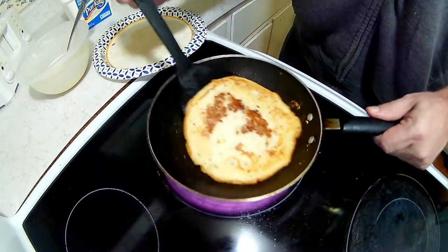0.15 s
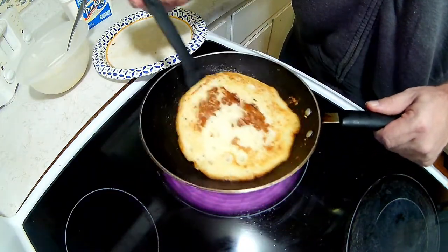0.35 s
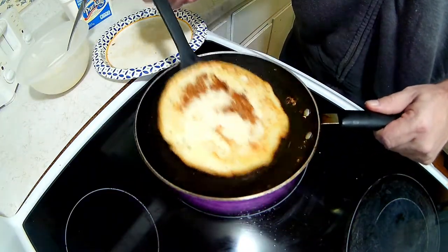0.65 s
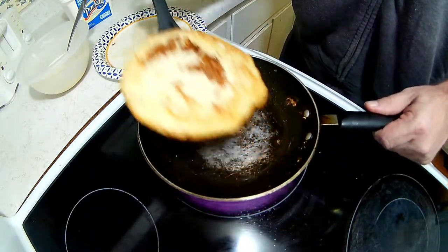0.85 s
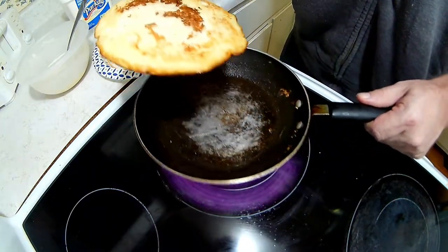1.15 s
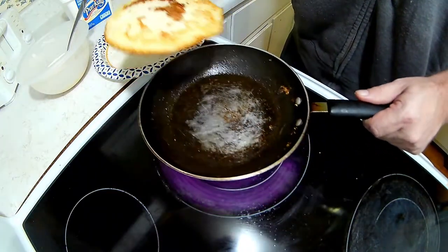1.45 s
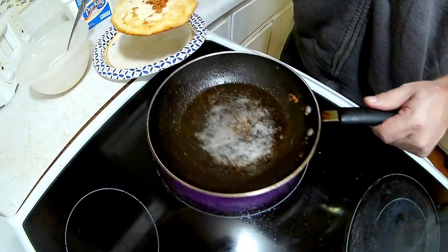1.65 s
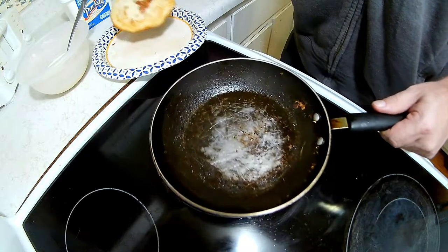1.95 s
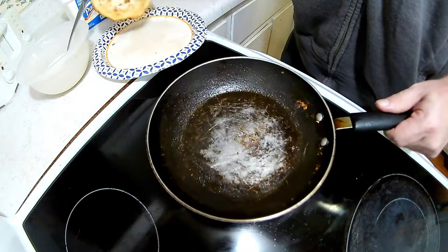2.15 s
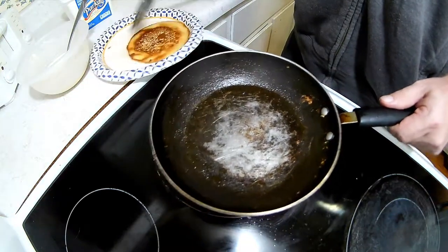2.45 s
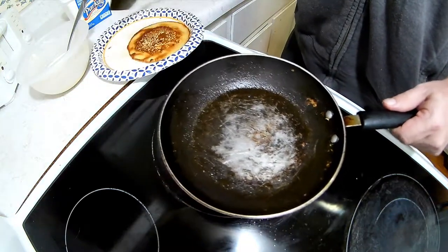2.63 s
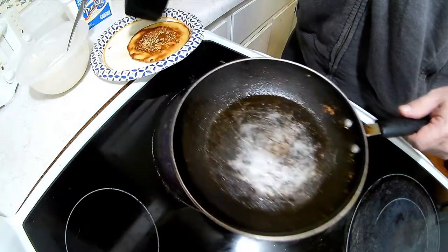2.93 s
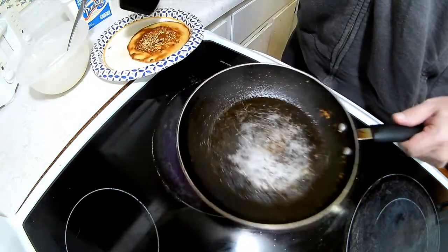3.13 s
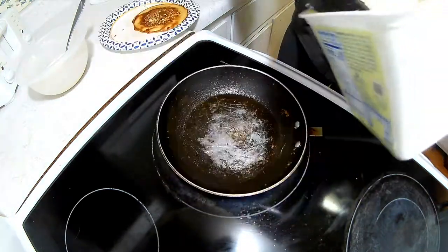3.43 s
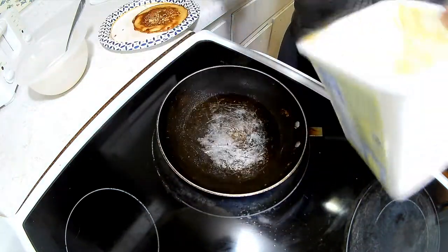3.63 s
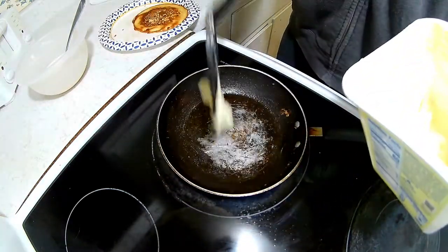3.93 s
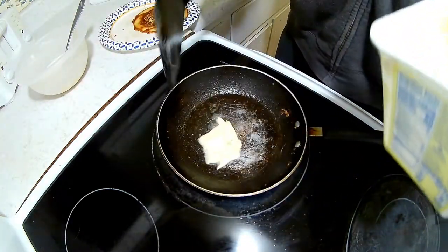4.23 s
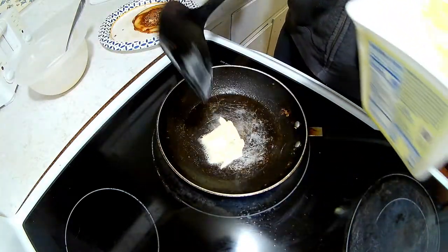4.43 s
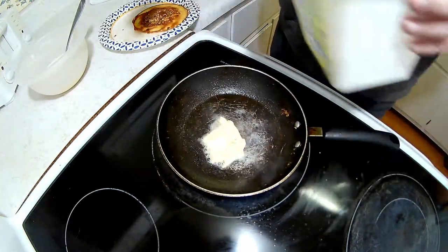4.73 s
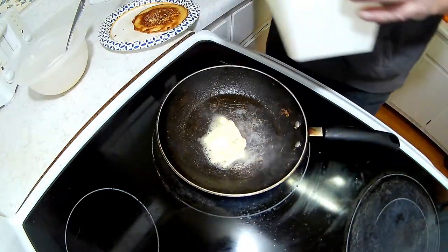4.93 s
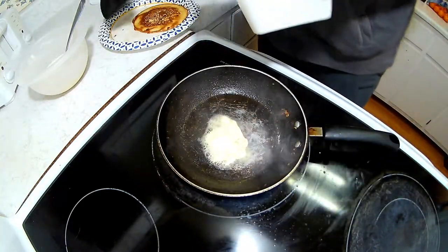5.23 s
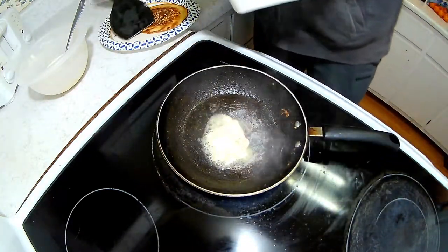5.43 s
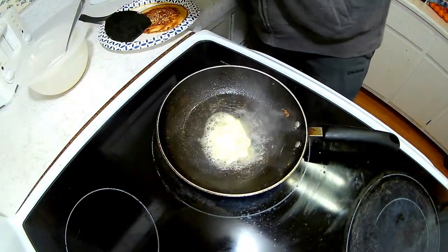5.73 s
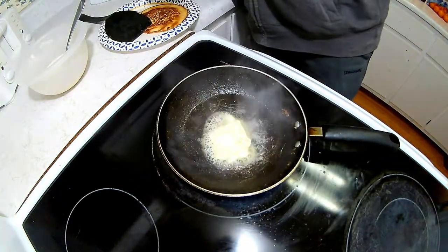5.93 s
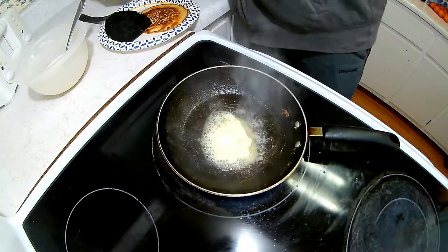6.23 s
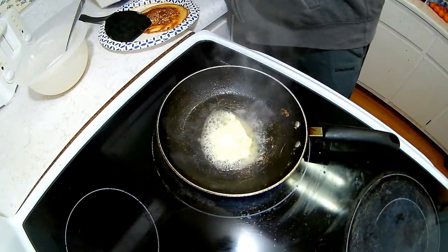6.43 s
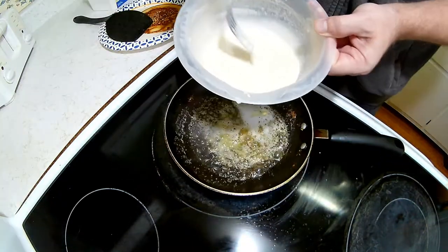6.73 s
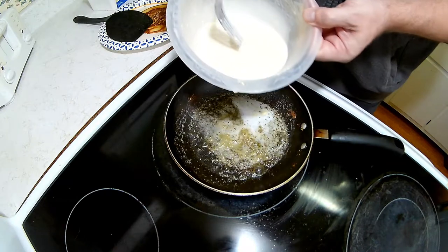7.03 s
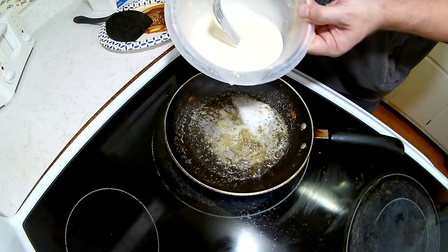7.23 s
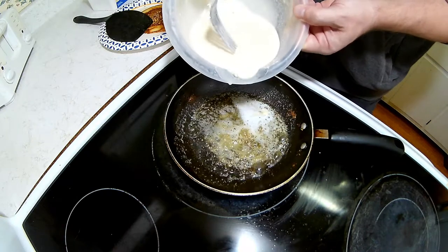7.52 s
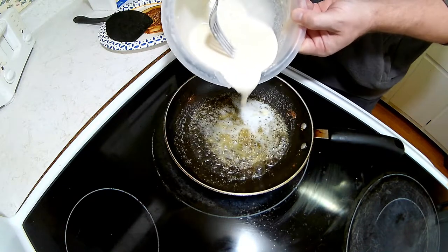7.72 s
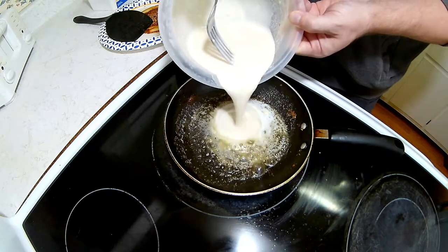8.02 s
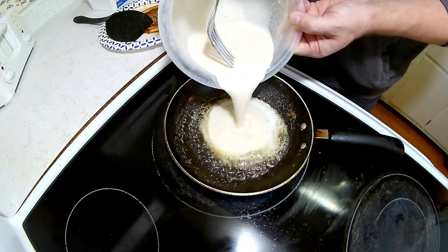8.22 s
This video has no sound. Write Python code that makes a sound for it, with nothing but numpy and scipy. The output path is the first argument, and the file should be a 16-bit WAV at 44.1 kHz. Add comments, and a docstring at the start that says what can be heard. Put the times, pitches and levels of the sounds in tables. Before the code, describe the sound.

A plastic spatula scrapes a pan, a pancake drops on a plate, the pan rattles down, butter sizzles, then batter gurgles into quieter fat.

```python
"""A plastic spatula scrapes under a pancake in a pan, over a low room rumble, and drops it on a plate.
The pan rattles back onto the glass hob, butter lands and sizzles, the spatula clacks on the plate.
After a jump to a later moment batter gurgles into quieter fat; a bowl bumps around the jump.
Contacts are click rattles ringing through bodies; fat and rumble are shaped noise, with bubble pops
in the fat; spits and whistle flares are noise puffs."""
import sys
import numpy as np
from scipy import signal
from scipy.io import wavfile
from scipy.ndimage import uniform_filter1d

SR = 44100
rng = np.random.default_rng(int(sys.argv[2]) if len(sys.argv) > 2 else 0)


def wav_out(sig):
    """Save sig, one row per channel (or a flat mono array), as 16-bit PCM at SR to the path in sys.argv[1]."""
    wavfile.write(sys.argv[1], SR, np.round(np.clip(np.atleast_2d(sig).T, -1, 1) * 32767).astype(np.int16))


N = 369116
TIME_S = np.arange(N) / SR
JUMP_S = 6.505  # cut to the later moment

# Plate modes under soft and hard blows: centre_hz, width_hz, relative_db
PLATE_RESONANCES = [(600, 110, 0), (996, 210, 2.5), (1027, 30, 6.5), (1140, 45, 3.5), (1334, 21, -3),
                    (1942, 35, 0), (2270, 200, -13), (2920, 60, -18), (3320, 52, -13.5), (4200, 170, -16.5),
                    (4940, 170, -17.5), (5740, 68, -16), (6100, 150, -20), (6920, 170, -21.5)]


def gain_of(db):
    """Decibels to amplitude."""
    return 10 ** (np.asarray(db) / 20)


def evened(x):
    """Scales to rms 1."""
    return x / np.sqrt(np.mean(x ** 2) + 1e-20)


def level(rows):
    """Interpolates (s, dB) breakpoints to every sample."""
    at_s, db = np.transpose(rows)
    return np.interp(TIME_S, at_s, db)


def bin_hz(size):
    """Bin frequencies of a real FFT."""
    return np.fft.rfftfreq(size, 1 / SR)


def shape(hz, broad, modes, broad_db):
    """Amplitude over frequency: a broad colour, offset by broad_db, plus resonance peaks in power."""
    f, db = np.transpose(broad)
    power = gain_of(2 * (np.interp(np.log(hz + 1), np.log(f + 1), db) + broad_db))
    for centre_hz, width_hz, top_db in modes:
        detune = 2 * (hz - centre_hz) / width_hz
        power = power + gain_of(2 * top_db) / (1 + detune ** 2) ** 2
    return np.sqrt(power)


def body(gain):
    """Minimum-phase ring of an amplitude response, 4000 samples, energy 1."""
    two_sided = np.r_[gain, gain[-2:0:-1]]
    log_gain = np.log(np.maximum(two_sided, 1e-5))
    spectrum = np.exp(np.conj(signal.hilbert(log_gain)))
    ring = np.fft.ifft(spectrum).real[:4000]
    return ring / np.linalg.norm(ring)


def hiss(gain, size, patchy_db, swell_db, patch_bins):
    """Random short-time spectra with drifting patches and a flicker shared by all bins."""
    frames = 4 * N // size + 8
    real, imag, patches = rng.standard_normal((frames, len(gain), 3)).T
    patches = uniform_filter1d(patches, patch_bins, 0)
    patches = evened(uniform_filter1d(patches, 14, 1))
    swell = evened(uniform_filter1d(rng.standard_normal(frames), 16))
    drift = gain_of(patchy_db * patches + swell_db * swell)
    z = (real + 1j * imag) * gain[:, None] * drift
    return evened(signal.istft(z, nperseg=size, noverlap=3 * size // 4)[1][:N])


def puffs(rows, t60_s):
    """Short decaying noise puffs around a pitch; rows: start_s, level_db, pitch_hz, width_hz."""
    out, age_s = np.zeros(N + 4000), np.arange(4000) / SR
    noise = rng.standard_normal((len(rows), 2, 4000))
    for (start_s, db, hz, width_hz), (real, imag) in zip(rows, noise):
        pole = np.exp(-np.pi * width_hz / SR)
        slow = signal.lfilter([1], [1, -pole], real + 1j * imag)
        band = evened((slow * np.exp(2j * np.pi * hz * age_s)).real)
        attack = np.minimum(age_s / 0.0036, 1)
        out[round(start_s * SR):][:4000] += gain_of(db - 60 * age_s / t60_s) * band * attack
    return out[:N]


def frying(broad, modes, broad_db, pops_per_s, spread_db, pops_db):
    """Dense steam hiss plus bursting bubbles of uneven size, both in the same colour."""
    steam_gain = shape(bin_hz(512), broad, modes, broad_db)
    steam = hiss(steam_gain, size=512, patchy_db=2.0, swell_db=1.06, patch_bins=3)
    sizes = gain_of(spread_db * np.minimum(rng.exponential(1, N), 5))
    bursts = sizes * (rng.random(N) < pops_per_s / SR) * rng.choice([-1., 1.], N)
    pops = signal.oaconvolve(bursts, body(shape(bin_hz(16384), broad, modes, broad_db)))
    return evened(steam + gain_of(pops_db) * evened(pops[:N]))


def rumble():
    """Low room noise gathered in a few room modes, a little quieter after the jump."""
    # hz, relative_db_per_hz
    rumble_colour = [(12, -21), (22, -10), (49, -11.5), (103, -2), (141, -10), (220, -18), (343, -19.5),
                     (480, -29), (600, -23), (1070, -25), (2000, -41), (3100, -47.5), (7900, -54.5),
                     (15700, -55.5)]
    # centre_hz, width_hz, relative_db
    room_modes = [(104.2, 14.2, 0), (222.8, 49, -11.5), (349, 16, -15.5), (567, 14, -12.5)]
    gain = shape(bin_hz(2048), rumble_colour, room_modes, 0.23)
    rms_db = np.where(TIME_S < JUMP_S, -43.5, -45.5)
    return gain_of(rms_db) * hiss(gain, size=2048, patchy_db=1.2, swell_db=-0.24, patch_bins=12)


def simmer():
    """Spent fat ticks on after the jump; spreading batter lowers it and smothers its treble."""
    # Quiet fat: hz, relative_db_per_hz
    simmer_colour = [(260, -27), (450, -37), (700, -28), (850, 5), (1050, -9.5), (1710, -7.5),
                     (3000, -13.5), (4500, -16), (6800, -17.5), (7900, -35), (8780, -24.5), (13900, -34.5)]
    bare_db, covered_db = -56, -60
    bare_tilt_db, covered_tilt_db = 1, -0.5  # treble rise per octave
    cover_start_s, cover_takes_s = 7.92, 0.32
    fat = frying(simmer_colour, [], -.1, pops_per_s=330, spread_db=4.0, pops_db=-8)
    hz, frame_s, z = signal.stft(fat, SR, nperseg=512)
    cover = np.clip((frame_s - cover_start_s) / cover_takes_s, 0, 1)
    fat_db = bare_db + cover * (covered_db - bare_db)
    tilt_db = bare_tilt_db + cover * (covered_tilt_db - bare_tilt_db)
    octaves = np.log2(hz / 3000 + .05)  # the offset limits the bass end
    z = z * gain_of(fat_db + np.outer(octaves, tilt_db))
    return (TIME_S >= JUMP_S) * signal.istft(z, SR, nperseg=512)[1][:N]


def gurgle():
    """Batter meets the fat: wet bubbles and hiss in one wide low band."""
    # centre_hz, width_hz
    gurgle_band = (1640, 1600)
    # at_s, level_db
    gurgle_level = [(7.45, -66), (7.56, -56), (7.7, -72), (7.9, -57), (8.05, -55.5), (8.37, -56.5)]
    floor = [(0, -60), (22050, -60)]
    wet = frying(floor, [(*gurgle_band, 0)], 0, pops_per_s=230, spread_db=3, pops_db=-8)
    return gain_of(level(gurgle_level)) * wet


def spits():
    """Single spits of fat, each one wide, quick puff."""
    # start_s, level_db, pitch_hz
    fat_spits = [(4.045, -27.5, 1220), (4.221, -36, 2850), (6.132, -44, 4230), (6.79, -49, 12100),
                 (6.99, -56, 9400), (7.163, -56, 9400), (7.219, -52, 4440), (7.553, -42, 3800),
                 (7.925, -50, 9600), (7.949, -49, 9900)]
    rows = [(s, db, hz, 0.17 * hz) for s, db, hz in fat_spits]
    return puffs(rows, t60_s=0.016)


def whistle():
    """Air over the pan whistles in a narrow noise band; short flares share its pitch."""
    # centre_hz, width_hz
    whistle_band = (1742, 88)
    # at_s, level_db
    whistle_level = [(4.03, -57), (4.25, -46), (4.6, -50), (5.2, -54), (6.1, -55.5), (6.505, -55.5)]
    # start_s, level_db
    whistle_flares = [(4.035, -38.5), (4.221, -38.5), (4.28, -34.5), (4.432, -36.5), (4.573, -36)]
    hz, width_hz = whistle_band
    peak = 1 / (1 + (2 * (bin_hz(2048) - hz) / width_hz) ** 2)
    air = hiss(peak, size=2048, patchy_db=-2.5, swell_db=0.0, patch_bins=4)
    flares = puffs([(s, db, hz, 100) for s, db in whistle_flares], t60_s=0.071)
    return gain_of(level(whistle_level)) * air, flares


def sizzle():
    """Butter boils, with the whistle over it, from its landing until the jump."""
    # Butter on the hot pan: hz, relative_db_per_hz
    sizzle_colour = [(260, -29), (450, -10.5), (700, -14), (870, -3.5), (1410, -9), (1760, -5.5),
                     (2960, -16), (4400, -18), (7000, -19.5), (7900, -41), (8700, -21.5), (10300, -31),
                     (11900, -24), (13400, -32), (14400, -31), (15700, -44)]
    # Air resonances over the pan: centre_hz, width_hz, relative_db
    air_modes = [(888, 8.1, 5), (2520, 33, -6.5), (3256, 22, -12), (3594, 28.5, -4.5), (4830, 60, -24.5),
                 (6760, 150, -18)]
    # at_s, level_db
    sizzle_level = [(4.03, -45.5), (4.7, -47), (5.7, -44.5), (6.5, -45)]
    landing_s, fade_in_s = sizzle_level[0][0], 0.035
    on = np.clip((TIME_S - landing_s) / fade_in_s, 0, 1) * (TIME_S < JUMP_S)
    boil = frying(sizzle_colour, air_modes, -5.0, pops_per_s=830, spread_db=-1.0, pops_db=-7.5)
    air, flares = whistle()
    return on * (gain_of(level(sizzle_level)) * boil + air) + flares


def contacts(rows, thing, broad_db, clicks_per_s, blow, rise_s, t60_s):
    """A blow inside a rattle of tiny clicks that swells, holds and dies, ringing uneven modes."""
    broad, modes = thing
    out, age_s = np.zeros(N + SR), np.arange(SR // 4) / SR
    noise = rng.standard_normal((len(rows), len(age_s)))
    chance = rng.random((len(rows), len(age_s)))
    spots = rng.uniform(-1, 1, (len(rows), len(modes)))  # where each contact touches
    high_pass = signal.firwin(65, 2000, pass_zero=False, fs=SR)
    main_blow = blow * (np.arange(len(age_s)) == round(rise_s * SR))
    for (start_s, db, hold_s, treble_db), size, draw, spot in zip(rows, noise, chance, spots):
        rattle = size * (draw < clicks_per_s / SR) * np.sqrt(SR / clicks_per_s)
        decay_db = 60 * np.maximum(age_s - rise_s - hold_s, 0) / t60_s
        swell = gain_of(db - decay_db) * np.minimum(age_s / rise_s, 1)
        force = (rattle + main_blow) * swell
        force = force * np.linalg.norm(swell) / np.linalg.norm(force + 1e-12)
        # the spot shifts mode pitch by up to 1.5 % and mode level by up to 3.5 dB
        pitch_shift = 1 + np.outer(spot[::-1], [.015, 0, 0])
        touched = modes * pitch_shift + np.outer(spot, [0, 0, 3.5])
        ring = body(shape(bin_hz(8192), broad, touched, broad_db))
        bright = signal.oaconvolve(ring, high_pass, "same")
        sound = signal.oaconvolve(force, ring + (gain_of(treble_db) - 1) * bright)
        if start_s < JUMP_S:
            sound = sound[:round((JUMP_S - start_s) * SR)]
        out[max(round(start_s * SR), 0):][:len(sound)] += sound
    return out[:N]


def bowl_bumps():
    """Bowl bumps: short rattles with a strong blow through the bowl's modes."""
    # start_s, level_db, hold_s, treble_above_2khz_db
    bumps = [(6.424, -33.5, 0.0041, -5), (6.437, -30, 0.0019, -10), (6.47, -38, 0.024, -4),
             (6.567, -25, 0.00056, 10), (6.58, -28.5, 0, -5), (6.592, -31.5, 0.00093, -2),
             (6.604, -40, 0.0017, -3)]
    # Broad colour: hz, relative_db_per_hz; modes: centre_hz, width_hz, relative_db
    bowl = [(90, -38), (150, -3.5), (440, -9.5), (820, -10), (1260, -14), (2000, -19), (2800, -34),
            (3600, -48), (6500, -65), (11000, -100)], [(344, 38, -6), (640, 190, -3), (840, 160, -2.5),
            (1080, 140, -4.5), (1750, 310, -21)]
    return contacts(bumps, bowl, broad_db=-4.0, clicks_per_s=4000, blow=8., rise_s=0.00143, t60_s=0.029)


def butter_plops():
    """Butter lands: dense soft clicks through one low mode."""
    # start_s, level_db, hold_s, treble_above_2khz_db
    plops = [(4.07, -38.5, 0.0089, -5), (4.094, -33, 0.0011, -4), (4.107, -43, 0.01, 6)]
    # Broad colour: hz, relative_db_per_hz; modes: centre_hz, width_hz, relative_db
    butter = [(71, -33), (120, -27), (330, 4), (596, -19), (673, -7.5), (1700, -21), (3000, -14),
              (3900, -41), (6600, -120)], [(241, 34, -0.86)]
    return contacts(plops, butter, broad_db=-7.0, clicks_per_s=9800, blow=4., rise_s=0.00294, t60_s=0.078)


def hob_rattle():
    """The pan set on the glass hob: sparse clicks, each with a clear blow."""
    # start_s, level_db, hold_s, treble_above_2khz_db
    rattles = [(3.304, -52, 0.039, 11.5), (3.349, -34.5, .002, -5), (3.372, -36.5, 0.0078, 7),
               (3.386, -30, 0.012, 0), (3.402, -33, 0.0031, 5.5), (3.418, -38.5, 0.011, -4),
               (3.447, -44, .01, -8), (3.488, -43.5, .002, -7)]
    # Broad colour: hz, relative_db_per_hz; modes: centre_hz, width_hz, relative_db
    hob = [(88, -46), (150, -12), (221, -0.5), (248, -9), (490, -13), (948, -9), (1940, -16), (2600, -32.5),
           (15500, -66)], [(650, 70, 2.5), (902, 180, -3), (1270, 78, -10), (1605, 99, -11),
           (1920, 140, -18), (2320, 120, -24)]
    return contacts(rattles, hob, broad_db=-7.0, clicks_per_s=2700, blow=5.3, rise_s=0.00552, t60_s=0.074)


def plate_drops():
    """The pancake drops on the plate and damps it, widening its modes."""
    # start_s, level_db, hold_s, treble_above_2khz_db
    drops = [(2.357, -47, 0.031, 2.5), (2.372, -35.5, 0.0013, 1), (2.382, -30.5, 0.0017, 0),
             (2.398, -41, 0.046, 1.5), (2.439, -30, 0.02, 1), (2.45, -26, 0, -5), (2.458, -25, 0.0049, 2.5),
             (2.478, -33, 0.0058, -3)]
    # hz, relative_db_per_hz
    soft_colour = [(20, -2), (45, -2), (110, 6), (200, -3.5), (420, -1), (535, -1.5), (900, -6.5),
                   (1200, -7.5), (3400, -18.5), (5200, -48), (6300, -28.5), (7600, -55), (8600, -42),
                   (15500, -62)]
    plate = soft_colour, np.multiply(PLATE_RESONANCES, [1, 2.5, 1])
    return contacts(drops, plate, broad_db=7.0, clicks_per_s=7000, blow=2.2, rise_s=.004, t60_s=0.06)


def plate_clacks():
    """The spatula clacks on the plate: fast hard blows on the undamped modes."""
    # start_s, level_db, hold_s, treble_above_2khz_db
    clacks = [(5.434, -42.5, 0.022, -6), (5.6245, -15, 0.0012, 7.5), (5.629, -9, 0.0025, 2.5),
              (5.643, -22.5, 0.0098, 5), (5.674, -34, 0.0091, -15), (5.703, -37.5, 0.021, -8)]
    # hz, relative_db_per_hz
    hard_colour = [(24, -32), (50, -6), (90, 14), (150, -1.5), (240, 2), (400, -15), (606, -4.5), (1020, 1),
                   (1410, -6), (1910, -6), (3840, -27.5), (6160, -26), (7700, -51), (15500, -60)]
    plate = hard_colour, PLATE_RESONANCES
    return contacts(clacks, plate, broad_db=-4.0, clicks_per_s=7000, blow=5.8, rise_s=.0012, t60_s=0.033)


def scrape():
    """The spatula slips along the pan: dense click rattles through the pan's modes."""
    # start_s, level_db, hold_s, treble_above_2khz_db
    slips = [(0.0, -38, 0.00013, 6), (0.014, -38.5, 0.066, -2.5), (0.061, -34, 0.027, 2),
             (0.12, -48.5, 0.047, 6), (0.163, -31.5, 0, -8), (0.182, -31.5, 0, -5), (0.197, -42, 0.023, -1),
             (0.226, -35, 0.021, -0.5), (0.244, -35, 0.019, 3), (0.295, -55, 0.0025, 2),
             (0.338, -46, .05, 3), (0.403, -39.5, .045, 4.5), (0.515, -49.5, 0.033, 4),
             (0.6, -54.5, 0.029, 4)]
    # Broad colour: hz, relative_db_per_hz; modes: centre_hz, width_hz, relative_db
    pan = [(290, -49), (500, -14), (1040, -10), (1510, -17), (1750, -5), (2430, -22), (2740, -37),
           (2890, -28.5), (12000, -66), (15600, -88), (22000, -120)], [(1030, 150, 1), (1190, 370, -9),
           (1360, 170, -14), (1820, 130, -9), (2250, 160, -24), (2717, 59, -15), (3350, 57, -27),
           (3990, 100, -26), (4600, 130, -39), (5590, 89, -31), (6330, 150, -37), (7250, 120, -39)]
    return contacts(slips, pan, broad_db=-4.5, clicks_per_s=9000, blow=2.7, rise_s=.005, t60_s=0.11)


def kitchen(x):
    """Sparse taps of random sign, dying quickly: a small hard room that returns little bass."""
    at = np.arange(300, 15000, 20) + rng.integers(0, 20, 735)
    t60_s = 0.22
    taps = np.zeros(15100)
    taps[at] = rng.choice([-1., 1.], 735) * gain_of(-60 * at / SR / t60_s)
    taps = signal.lfilter(*signal.butter(2, 350, "high", fs=SR), taps)
    return signal.oaconvolve(x, taps / np.linalg.norm(taps))[:N]


def scene():
    """All sources in one channel; the jump cuts off ringing contacts and their room tail."""
    handling = scrape() + plate_drops() + hob_rattle() + butter_plops() + plate_clacks() + bowl_bumps()
    late = TIME_S >= JUMP_S
    room = np.where(late, kitchen(handling * late), kitchen(handling))
    fat = sizzle() + simmer() + gurgle() + spits()
    return (rumble() + fat + handling + gain_of(-10) * room)[None]


def record(dry):
    """Band limit; the later moment carries less top treble."""
    def low_passed(edge_hz):
        taps = signal.firwin(511, edge_hz, window=("kaiser", 9), fs=SR)
        return signal.oaconvolve(dry, taps[None], "same")
    return np.where(TIME_S < JUMP_S, low_passed(15730), low_passed(13500))


dry = scene()
out = record(dry)
wav_out(out)
```